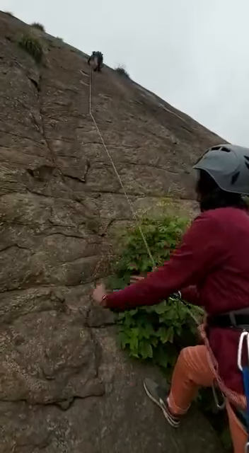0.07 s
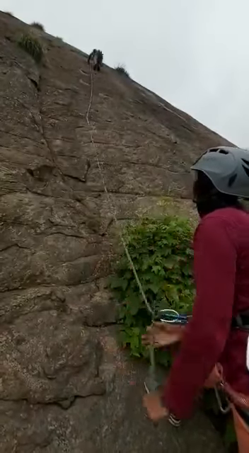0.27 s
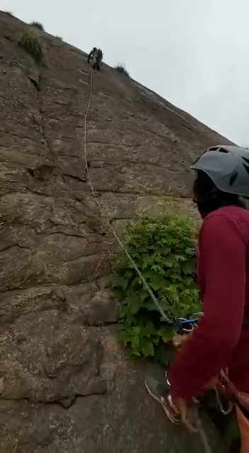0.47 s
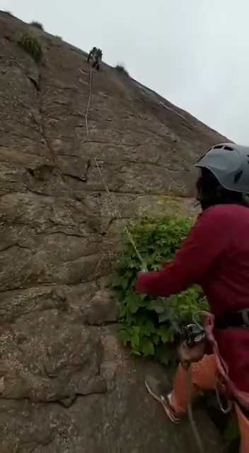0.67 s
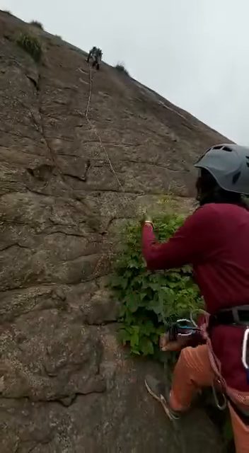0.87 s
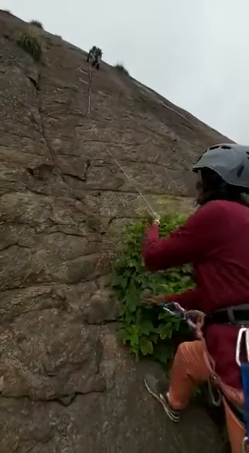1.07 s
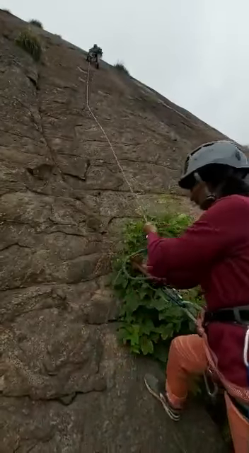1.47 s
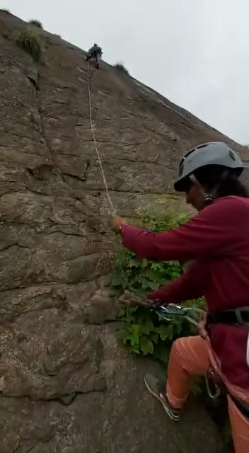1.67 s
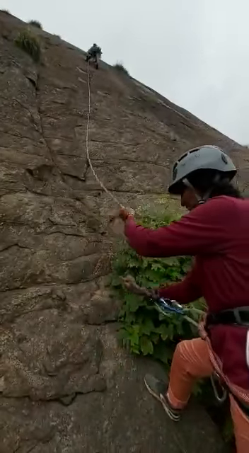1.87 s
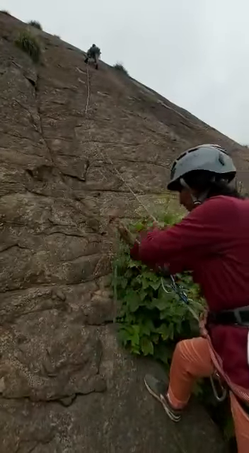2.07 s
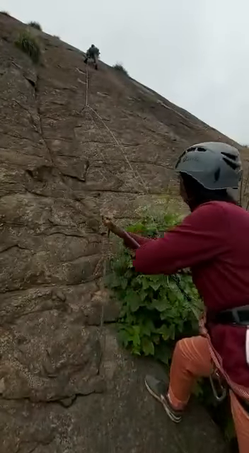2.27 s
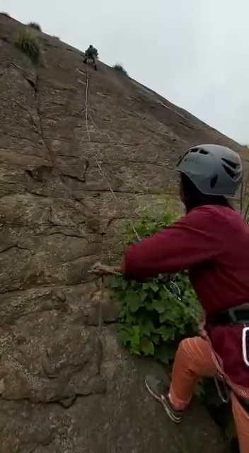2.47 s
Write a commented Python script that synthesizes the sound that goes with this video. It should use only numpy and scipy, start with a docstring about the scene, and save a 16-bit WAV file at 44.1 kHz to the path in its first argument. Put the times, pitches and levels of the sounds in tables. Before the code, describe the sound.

Rope swishes through a metal belay device with sharp clicks, as wind buffets the microphone.

```python
"""At the foot of a rock face, a climber's partner takes in rope. It swishes through hands and a metal
belay device (a rope brake), and its woven cover zips faintly and rasps under load. The device and its
carabiner (a metal clip) click as the rope tightens and slackens, and the rock echoes the clicks.
Light wind buffets the left and right microphones, each in its own way; the gear hangs to the right.
A faint recorder hiss grows louder near the end."""
import sys
import numpy as np
from scipy.fft import rfft, irfft, next_fast_len
from scipy.io import wavfile
from scipy.ndimage import uniform_filter1d, map_coordinates

SR = 44100
rng = np.random.default_rng(int(sys.argv[2]) if len(sys.argv) > 2 else 0)


def int16_out(signal):
    """Quantize to a 16-bit WAV file."""
    q = np.round(np.clip(np.atleast_2d(signal).T, -1, 1) * 32767)
    wavfile.write(sys.argv[1], SR, q.astype(np.int16))


N = 110250
T = np.arange(N) / SR


def amp(db):
    """Turn decibels (dB) into a number to multiply a sound by."""
    return 10 ** (np.asarray(db) / 20)


def unit(x):
    """Scale a signal to an average power of 1."""
    return x / np.sqrt(np.mean(x ** 2) + 1e-20)


def gain_at(colour, hz):
    """Read the gain at any frequency from rows of Hz and dB, joined on a musical (log) scale."""
    freqs, db = np.transpose(colour)
    return amp(np.interp(np.log(hz + 1), np.log(np.sort(freqs) + 1), db))


def level(rows):
    """Join rows of seconds and dB into a gain for every sample."""
    return amp(np.interp(T, *np.transpose(rows)))


def wobble(rate):
    """A smooth curve through `rate` random values a second."""
    return map_coordinates(rng.standard_normal(8192), [T * rate], mode="wrap")


def filtered(x, response):
    """Multiply each frequency in x by what `response` gives for it."""
    size = next_fast_len(N + 8192)
    return irfft(rfft(x, size) * response(np.fft.rfftfreq(size, 1 / SR)), size)[..., :N]


def coloured(x, colour):
    """Give x a colour (a balance of low and high frequencies) and a power of 1."""
    return unit(filtered(x, lambda hz: gain_at(colour, hz)))


def noise(colour):
    """Coloured noise, unrelated between left and right."""
    return coloured(rng.standard_normal((2, N)), colour)


def pan(db):
    """Left and right gains, `db` apart: positive is to the left, negative to the right."""
    return unit(amp(np.array([[db / 2], [-db / 2]])))


def burst(start, fade_s, rise_s):
    """A quick rise, then a fade that drops 60 dB in fade_s seconds."""
    age = np.maximum(T - start, 0)
    return (1 - np.exp(-age / rise_s)) * np.exp(-np.log(1000) * age / fade_s)


def recorder_hiss():
    """A faint recorder hiss that grows louder near the end."""
    # Each row: time in seconds, level in dB.
    hiss_levels = [(0, -69), (1.2, -67.5), (1.9, -61.5), (2.03, -63), (2.22, -58.5), (2.44, -59.5),
                   (2.5, -66)]
    # Each row: frequency in Hz, relative level in dB.
    hiss_colour = [(100, 0), (700, -5.5), (2000, -9), (3600, 0.5), (4500, 5.5), (5800, 1.5), (6800, 1),
                   (9000, 1), (12000, 2), (16000, 1.5)]
    return level(hiss_levels) * pan(-6) * noise(hiss_colour)


def breeze():
    """A weak breeze flows round the microphones."""
    # Each row: time in seconds, level in dB.
    breeze_levels = [(0, -66), (.35, -72), (.7, -60), (1.9, -65.5), (2.3, -53), (2.5, -59)]
    # Each row: frequency in Hz, relative level in dB.
    breeze_colour = [(40, -41), (150, 4), (300, -1), (450, -11), (700, -30), (1300, -48)]
    return level(breeze_levels) * noise(breeze_colour)


def churn(colour, steady_s):
    """Swirling air: noise whose strength is evened out over steady_s seconds."""
    swirl = noise(colour)
    power = abs(uniform_filter1d(swirl ** 2, int(steady_s * SR), axis=1))
    return swirl / np.sqrt(power + 0.04)


def wind():
    """Each microphone rumbles with its own gusts, and eddies (small whirls of air) thump against it."""
    # Gusts on each side. Each row: time in seconds, level in dB.
    left_gusts = [(0, -46.5), (.035, -34.5), (.075, -48.5), (.15, -28), (.25, -60), (.29, -45.5),
                  (.375, -48.5), (.4, -27), (.55, -31), (.6, -40), (.63, -28), (.745, -35), (.8, -20),
                  (.865, -25.5), (.91, -16.5), (.97, -34), (1.03, -38), (1.07, -21.5), (1.11, -24.5),
                  (1.15, -35), (1.18, -18), (1.27, -34), (1.32, -25), (1.36, -35), (1.42, -23.5),
                  (1.46, -27.5), (1.55, -28), (1.58, -21), (1.64, -32), (1.72, -30), (1.85, -15.5),
                  (1.89, -16), (1.93, -50), (2.0, -94), (2.02, -42.5), (2.22, -27), (2.3, -39.5),
                  (2.43, -44.5), (2.46, -61), (2.5, -47)]
    right_gusts = [(0, -80), (.1, -70), (.13, -45.5), (.32, -29.5), (.36, -38.5), (.44, -42.5), (.5, -23),
                   (.57, -19.5), (.69, -38), (.8, -30.5), (.86, -42), (.89, -31.5), (1.11, -28.5),
                   (1.15, -21.5), (1.19, -26), (1.35, -19.5), (1.47, -29.5), (1.61, -25), (1.66, -40),
                   (1.8, -27), (1.9, -29), (1.98, -40.5), (2.01, -65), (2.04, -38), (2.12, -52),
                   (2.22, -21.5), (2.28, -69), (2.39, -83), (2.43, -29), (2.5, -60)]
    # Each row: frequency in Hz, relative level in dB.
    rumble_colour = [(15, -48), (28, -30), (40, -8.5), (60, 0.5), (92, 1.5), (130, -5), (220, -22.5),
                     (320, -29), (450, -48), (700, -56), (1200, -101)]
    flutter_colour = [(60, -32), (160, 7), (250, -3), (340, -9.5), (450, -17), (700, -44), (1200, -51)]
    eddy_colour = [(40, -49), (130, 4.5), (220, 3), (320, -6.5), (450, -15), (650, -22), (1000, -28),
                   (1600, -88)]
    # Each row: peak time in seconds, level in dB, pan in dB, half width in seconds, treble cutoff in Hz.
    eddies = [(0.41, -28.5, 22, 0.0096, 306), (.465, -30, 28, 0.0054, 327), (0.51, -25.5, -15, .009, 373),
              (0.54, -31, 23, 0.0032, 400), (0.629, -33.5, 1.5, 0.013, 407), (0.718, -33.5, 4, 0.0046, 467),
              (0.836, -28.5, 17, 0.016, 260), (.89, -28.5, 20, 0.0053, 380),
              (0.909, -21.5, 30, 0.0034, 315), (1.042, -34, -20, .006, 377), (1.123, -39.5, 28, 0.014, 384),
              (1.226, -31.5, 12, 0.0068, 362), (1.259, -35, -17, 0.02, 400), (1.315, -22, 3.5, .01, 545),
              (1.39, -32.5, 11, 0.0057, 387), (1.581, -24.5, 19.5, 0.013, 495),
              (1.759, -32.5, 14, .016, 466), (1.828, -21, 29, 0.0061, 630), (1.872, -28.5, 14, 0.016, 560),
              (1.981, -36.5, -27, 0.0035, 292), (2.09, -39.5, 1.5, 0.0098, 328),
              (2.221, -32.5, -6, .01, 333), (2.345, -38, 12, 0.0063, 405)]
    typical_gust_db, flutter_db = -20.5, -38.5
    gust = np.array([level(left_gusts), level(right_gusts)])
    out = gust * churn(rumble_colour, steady_s=0.0263)
    flutter_gain = amp(flutter_db) * (gust / amp(typical_gust_db)) ** 0.93  # gusts bring finer swirls
    out += flutter_gain * churn(flutter_colour, steady_s=0.0411)
    swirl = churn(eddy_colour, steady_s=0.033)
    for peak, db, side_db, width, cutoff_hz in eddies:
        puff = amp(db) * pan(side_db) * np.exp(-.5 * ((T - peak) / width) ** 2) * swirl
        out += filtered(puff, lambda hz: 1 / np.sqrt(1 + (hz / cutoff_hz) ** 8))
    return filtered(out, lambda hz: 1 / (1 + (hz / 850) ** 8))  # little is left above 850 Hz


def friction(colour, flutter_db, flutter_rate):
    """Fibres catch and slip over a smooth hiss; uneven pressure makes the level flutter."""
    slips_per_s, slip_share = 2500, 0.27
    slips = (rng.random(N) < slips_per_s / SR) * rng.standard_normal((2, N))
    rub = np.sqrt(slip_share) * unit(slips) + np.sqrt(1 - slip_share) * rng.standard_normal((2, N))
    return unit(coloured(rub, colour) * amp(flutter_db * wobble(flutter_rate)))


def sleeves():
    """Sleeves and hands rustle as they shift on the rope."""
    # Each row: time in seconds, level in dB.
    rustle_levels = [(0, -55.5), (.8, -60), (1.1, -56), (1.3, -55), (1.55, -56.5), (1.66, -53.5),
                     (1.82, -57.5), (1.89, -57), (1.92, -66), (2.02, -75), (2.1, -65), (2.22, -65.5),
                     (2.44, -72), (2.5, -78)]
    # Each row: frequency in Hz, relative level in dB.
    rustle_colour = [(300, -9), (900, -12.5), (1500, -1.5), (2400, 1.5), (3300, -5.5), (5000, -10),
                     (6800, -17), (9000, -12), (12000, -10.5), (16000, -15)]
    return level(rustle_levels) * friction(rustle_colour, flutter_db=1.6, flutter_rate=25)


def slaps():
    """Hand and rope meet in dull slaps, too soft to ring."""
    # Each row: start in seconds, level in dB, fade time in seconds.
    touches = [(.568, -38, .04), (1.288, -48, .03), (1.4942, -32, .02), (1.888, -49, .02)]
    # Each row: frequency in Hz, relative level in dB.
    slap_colour = [(400, -28), (800, -15), (1250, -4), (2400, 0), (4000, -11), (7000, -24), (16000, -32)]
    shape = sum(amp(db) * burst(start, fade_s, rise_s=0.0015) for start, db, fade_s in touches)
    return noise(slap_colour) * shape


def zips():
    """The rope's woven cover runs over an edge and sings at a pitch set by its speed."""
    # Each row: start and length in seconds, first and last pitch in Hz, level in dB,
    # pitch wobble as a fraction of the pitch.
    runs = [(0, .125, 2010, 1985, -56, .018), (.13, .18, 2480, 2300, -57.5, .035),
            (.26, .085, 2650, 3500, -56, .09), (.715, .055, 3900, 3350, -53.5, .07),
            (.935, .07, 2450, 3650, -51.5, .055), (.945, .05, 3950, 4950, -53.5, .04),
            (1.003, .03, 3000, 2750, -50, .09)]
    out = np.zeros(N)
    for start, length, first_hz, last_hz, db, waver in runs:
        progress = np.clip((T - start) / length, 0, 1)
        hz = (first_hz + (last_hz - first_hz) * progress) * (1 + waver * wobble(400))
        tone = unit(np.sin(2 * np.pi * np.cumsum(hz) / SR))
        swell = np.sqrt(abs(np.sin(np.pi * progress)))
        out += amp(db + 2.0 * wobble(300)) * swell * tone
    return out


def rasp():
    """Under a hard pull the rope's cover bites and drags coarsely through the device."""
    # Each row: time in seconds, level in dB.
    rasp_levels = [(.4, -75), (.465, -45), (.515, -54), (.558, -47), (.572, -40), (.645, -43.5), (.77, -72),
                   (.92, -52), (1.1, -75), (2.5, -90)]
    # Each row: frequency in Hz, relative level in dB.
    rasp_colour = [(200, -18), (450, 2), (750, -8), (1200, 5), (1700, -2), (2400, 1), (4000, -9),
                   (7000, -33), (16000, -21)]
    return level(rasp_levels) * friction(rasp_colour, flutter_db=2.7, flutter_rate=260)


def swish():
    """The running rope rubs against hands and metal."""
    # Each row: time in seconds, level in dB.
    swish_levels = [(0, -50), (.02, -50), (.07, -58), (.14, -49), (.2, -46), (.26, -52.5), (.31, -51.5),
                    (.38, -58), (.46, -44.5), (.54, -45.5), (.57, -41), (.62, -40.5), (.705, -42.5),
                    (.75, -51.5), (.8, -55), (.87, -47.5), (1.0, -45.5), (1.06, -53), (1.2, -52),
                    (1.42, -64), (1.48, -50.5), (1.54, -60), (1.885, -59.5), (1.92, -69), (2.5, -68)]
    # Each row: frequency in Hz, relative level in dB.
    swish_colour = [(200, -15), (750, -18), (1250, -3), (1800, -1), (2500, 2.5), (3500, -0.5), (5500, -4),
                    (6900, -10.5), (8800, -7.5), (10500, -10), (12300, -5), (16000, -20)]
    return level(swish_levels) * friction(swish_colour, flutter_db=1.2, flutter_rate=140)


def shadow(sound):
    """The microphones' housing shields the left one from the rope, dulling its treble."""
    # Each row: frequency in Hz, change on the left side in dB.
    left_change = [(400, 6), (1300, -9.5), (2400, -16.5), (4400, -7.5), (8000, -3.5), (15000, -15.5)]
    return np.array([filtered(sound[0], lambda hz: gain_at(left_change, hz)), sound[1]])


def clicks(hits, tones, colour, ring_db):
    """Each contact cracks, rattles briefly and sets the metal ringing."""
    crack_fade_s, crack_rise_s, rattle_gap_s = .0028, .0002, .0013
    tail_db, rattle_db = -19, -8
    out, crack = np.zeros((2, N)), noise(colour)
    age = np.arange(SR // 12) / SR
    for start, db, side_db, hit_ring_db, rattle_s in hits:
        shape = burst(start, crack_fade_s, crack_rise_s)
        shape += amp(tail_db) * burst(start, fade_s=.028, rise_s=.001)
        for lag in np.arange(0, rattle_s, rattle_gap_s):
            bounce = burst(start + lag + rattle_gap_s * rng.random(), crack_fade_s, crack_rise_s)
            shape = np.hypot(shape, amp(rattle_db) * bounce)  # their powers add up
        hit = crack * shape
        first = round(start * SR)
        for hz, tone_db, fade_s in tones:
            tone = np.sin(2 * np.pi * (hz * age + rng.random((2, 1))))
            fade = np.exp(-np.log(1000) * age / fade_s)
            gain = amp(ring_db + hit_ring_db + tone_db + rng.standard_normal())
            hit[:, first:first + len(age)] += gain * tone * fade
        out += amp(db) * pan(side_db) * hit
    return out


def carabiner():
    """The metal clip ticks brightly as the rope tightens and slackens."""
    # Each row: start in seconds, level in dB, pan in dB, relative ring in dB, rattle length in seconds.
    ticks = [(.0125, -35, -8, -14, .002), (.0285, -37, -8, -14, .002), (.0958, -28.5, -13, -10, .001),
             (.1027, -18.5, -14, -2, .001), (.1114, -14.5, -13, -12, .001), (.172, -23, -10, -12, .002),
             (.199, -31, -10, -6, .003), (.2232, -25.5, -11, -13, .006), (.4725, -26, -8, -10, .012),
             (.695, -33, -8, -14, .004), (1.467, -37, -9, -10, .018), (1.491, -34, -9, -12, .006),
             (1.878, -41, -8, -12, .005), (2.401, -43, -6, -10, .002)]
    clip_tones = [(1950, -22, .04), (2370, -19, .045), (4900, -21, .025), (7880, -18, .03),
                  (8620, -15, .03), (9250, -13, .025), (14680, -3, .045)]
    # Each row: frequency in Hz, relative level in dB.
    tick_colour = [(700, -50), (2400, -19), (3500, -17), (4900, -7), (6900, -14), (9000, -1), (10000, -5),
                   (11500, -4.5), (13500, -12), (15000, -2.5), (17000, -9)]
    return clicks(ticks, clip_tones, tick_colour, ring_db=-9)


def belay_device():
    """The metal rope brake knocks and rings as the load on it changes."""
    # Each row: start in seconds, level in dB, pan in dB, relative ring in dB, rattle length in seconds.
    knocks = [(.4894, -17, -3.5, -10, .005), (1.003, -20.5, -4.5, -13, .011),
              (1.5997, -20.5, -8, -.5, .001), (1.6235, -40, -6, -5, .003), (1.649, -37, -5, -5, .003),
              (1.742, -39, -6, -12, .006)]
    # The brake's ringing tones. Each row: pitch in Hz, relative level in dB, fade time in seconds.
    brake_tones = [(2520, -18, .04), (3020, -17, .06), (5730, -17, .022), (6150, -2, .033),
                   (7430, -13, .025), (8230, -9, .018), (11900, -8, .01)]
    # Each row: frequency in Hz, relative level in dB.
    knock_colour = [(600, -50), (1600, -18), (2800, 4), (4000, -8), (5800, 0), (6900, -16), (8200, 6.5),
                    (10200, -6), (12200, 5.5), (13600, -1), (16000, -4)]
    return clicks(knocks, brake_tones, knock_colour, ring_db=-5.5)


def rock_echo(sound, delay_s=.0135, echo_db=-16):
    """The rock face adds one quick, quiet echo to a sound."""
    return filtered(sound, lambda hz: 1 + amp(echo_db) * np.exp(-2j * np.pi * hz * delay_s))


def scene():
    """Metal gear and rope in front of the rock, with wind and a faint recorder hiss."""
    gear = rock_echo(belay_device() + carabiner())
    background = breeze() + recorder_hiss()
    rope = shadow(swish() + sleeves() + zips() + rasp() + slaps())
    return background + wind() + rope + gear


def record(dry):
    """Cut away the very highest treble, from 15950 Hz up."""
    return filtered(dry, lambda hz: hz < 15950)


dry = scene()
out = record(dry)
int16_out(out)
```